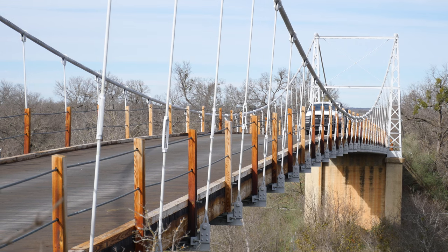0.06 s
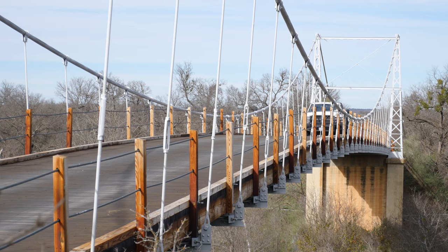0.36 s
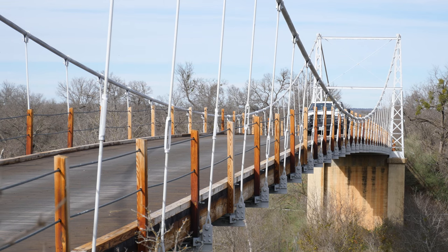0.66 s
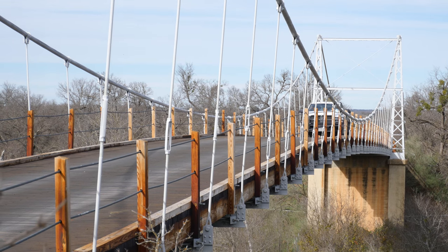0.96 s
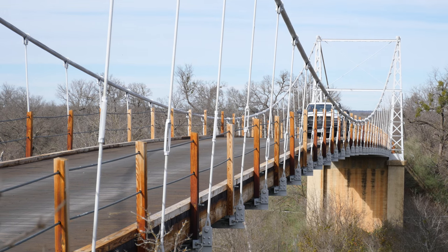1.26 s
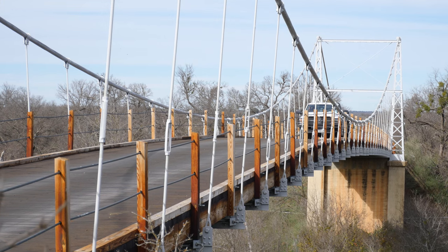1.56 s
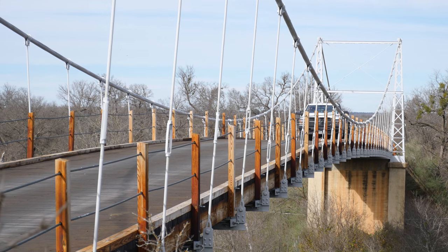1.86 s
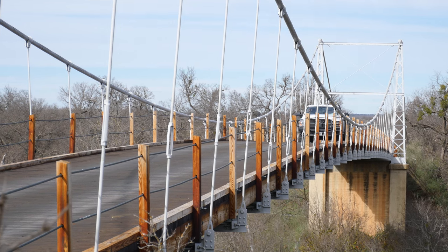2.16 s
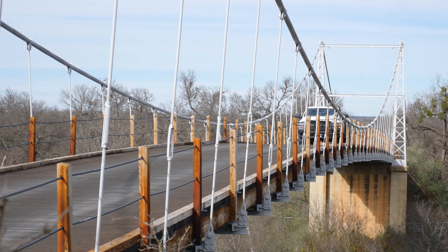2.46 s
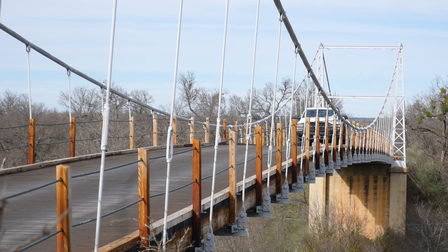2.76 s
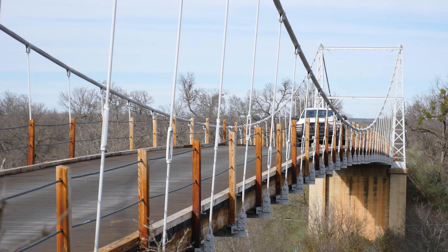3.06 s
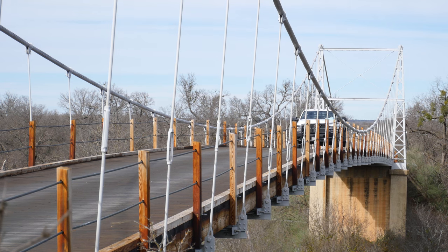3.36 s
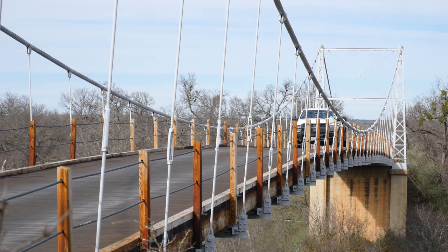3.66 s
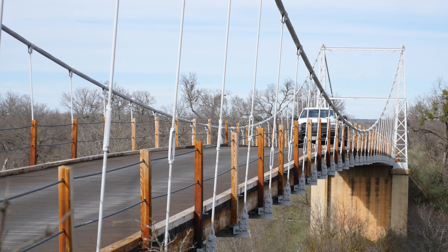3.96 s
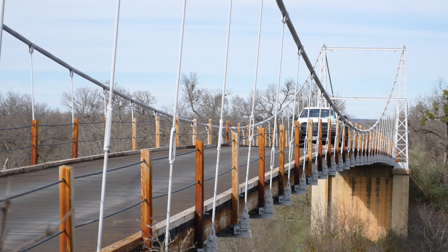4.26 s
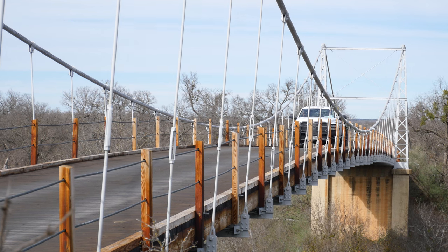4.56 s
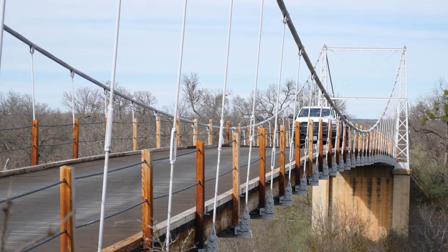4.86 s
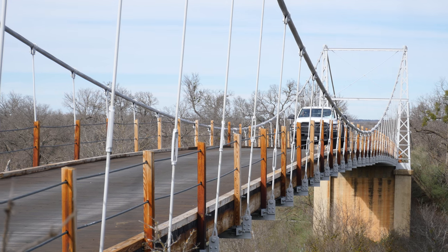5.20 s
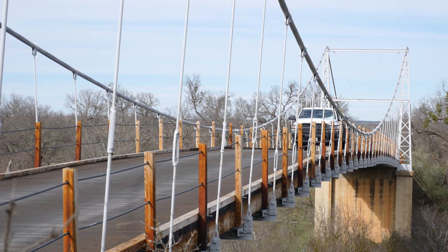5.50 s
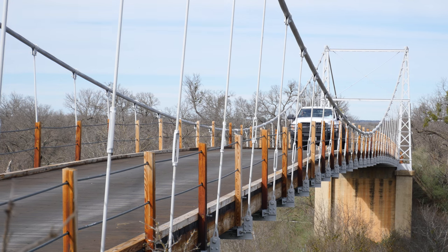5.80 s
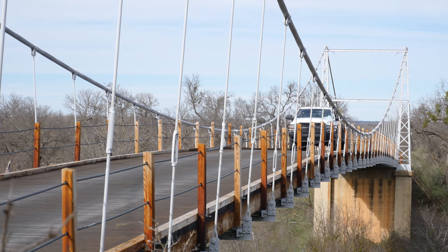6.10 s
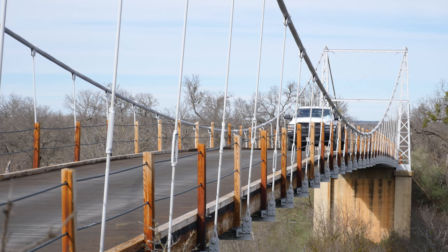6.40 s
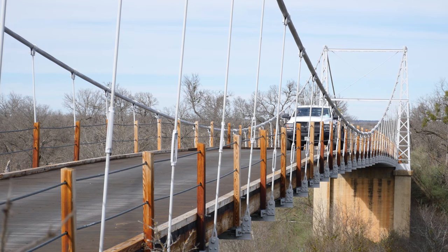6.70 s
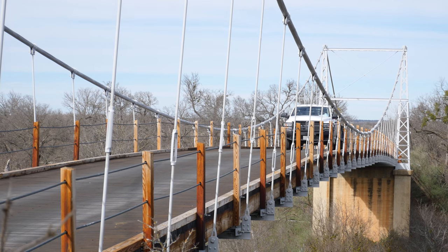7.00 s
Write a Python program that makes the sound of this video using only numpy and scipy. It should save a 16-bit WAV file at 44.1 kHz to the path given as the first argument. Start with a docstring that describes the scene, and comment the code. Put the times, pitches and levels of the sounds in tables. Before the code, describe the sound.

Uneven metallic bangs with a long, hollow ring come from the loose deck plates of a bridge as a truck slowly approaches. They pause after about three seconds, leaving small cable ticks, a few barely audible bird peeps and softly rustling trees. Gusts then rumble and thump on the microphone while the engine hum and its faint pulsing whine swell, and three more steel clanks land near the end.

```python
"""Truck on a steel bridge

A pickup truck creeps across a steel-decked suspension bridge, heard from the bank. Its wheels rock
three loose plates: each slap cracks, booms and rings on through the span. The engine murmurs and
whines faintly, trees rustle, wind buffets the microphone, the railing and cables tick and birds peep."""
import sys
import numpy as np
from scipy import signal
from scipy.io import wavfile
from scipy.ndimage import uniform_filter1d

SR = 44100
rng = np.random.default_rng(int(sys.argv[2]) if len(sys.argv) > 2 else 0)


def to_wav(s):
    """Save 16-bit WAV."""
    ch = np.atleast_2d(s).T  # columns
    pcm = np.round(np.clip(ch, -1, 1) * 32767)  # PCM
    wavfile.write(sys.argv[1], SR, pcm.astype(np.int16))


N = 310464
TIME = np.arange(N) / SR
FRAME, HOP = 1024, 256  # noise is built in short overlapping pieces
HZ = np.fft.rfftfreq(FRAME, 1 / SR)


def amp(db):
    """Turns decibels into a gain."""
    return 10 ** (np.asarray(db) / 20)


def unit_rms(x):
    """Scales a signal to an average power of 1."""
    return x / np.sqrt(np.mean(x ** 2) + 1e-20)


def wobble(n, smooth_samples):
    """A smooth random wiggle around zero."""
    return unit_rms(uniform_filter1d(rng.standard_normal(n), smooth_samples))


def over_pitch(points, hz=HZ):
    """Joins a table's points with straight lines on a log-frequency axis."""
    f, value = np.transpose(points)
    return np.interp(np.log(hz + 1), np.log(f + 1), value)


def over_time(points):
    """Joins a table's points with straight lines in time."""
    return np.interp(TIME, *np.transpose(points))


def fade(t, t60):
    """Dies away by 60 dB in t60 seconds."""
    return np.exp(-np.log(1000) * t / t60)


def pan(lean_db):
    """Left and right gains; a positive lean is louder on the left."""
    return amp(np.array([[.5], [-.5]]) * lean_db)


def add(mix, start_s, sound):
    """Mixes in a stereo sound at its start time."""
    at = round(start_s * SR)
    sound, part = sound[:, max(-at, 0):], mix[:, max(at, 0):]
    part[:, :sound.shape[1]] += sound[:, :part.shape[1]]


def filtered(x, order, hz, kind):
    """Cuts away part of the frequency range; a higher order cuts more steeply."""
    return signal.sosfilt(signal.butter(order, hz, kind, fs=SR, output="sos"), x)


# how alike the bridge sounds on the left and right: f/Hz, likeness (1 or more is identical)
BRIDGE_LIKENESS = [(60, 2), (300, 0.86), (700, 1.07), (1400, 0.54), (3100, 0.7), (7000, 0.9), (15000, -0.9)]
# how much louder the bridge is on the left: f/Hz, lean/dB
BRIDGE_LEAN = [(100, 3.5), (380, 1.2), (700, 4.6), (1300, 5.1), (2400, 7), (4400, 3.7), (8000, 5.3),
               (15000, 1)]
def noise(seconds, tone_db, t60=np.inf,
          likeness=over_pitch(BRIDGE_LIKENESS), lean_db=over_pitch(BRIDGE_LEAN)):
    """Stereo noise; tone_db sets its balance of low and high, and each frequency can fade on its own."""
    n = round(seconds * SR)
    t = np.arange(n // HOP + 6)[:, None] * HOP / SR
    left, other = np.exp(2j * np.pi * rng.random((2, len(t), len(HZ))))
    likeness = np.clip(likeness, -1, 1)
    right = likeness * left + np.sqrt(1 - likeness ** 2) * other
    spectra = np.array([left, right]) * pan(lean_db)[:, None]
    spectra = spectra * unit_rms(amp(tone_db)) * fade(t, t60) * np.sqrt(6 / FRAME)
    return signal.istft(spectra.transpose(0, 2, 1), nperseg=FRAME, noverlap=FRAME - HOP)[1][:, :n]


def ring(notes, t):
    """Struck steel sounds all its notes at once; each fades, a little out of step left and right."""
    phases = rng.random((len(notes), 1, 1)) + rng.normal(0, .03, (len(notes), 2, 1))
    out = np.zeros((2, len(t)))
    for (hz, db, t60), phase in zip(notes, phases):
        gain = pan(over_pitch(BRIDGE_LEAN, hz)) * amp(db)
        out += gain * fade(t, t60) * np.sin(2 * np.pi * (hz * t + phase))
    return out


def steel_crack(t, notes, ring_db, snap_db, snap_hz, contact_s):
    """Steel hits steel: a brief ring, and a snap as the rough edges grind together."""
    snap = noise(2, -30 * np.log2((HZ + 1) / snap_hz) ** 2) * np.exp(-(t / 0.00095) ** 2)
    crack = (amp(ring_db) * ring(notes, t) + amp(snap_db) * snap) * np.tanh(t / contact_s) ** 2
    return filtered(crack, 1, (5500, 6300), "bandstop")  # hollow between its lower and upper notes


def chatter(crack, bounces=12, gap_s=.0055, fade_s=0.064):
    """The crack repeats and fades as the plate bounces to rest on its beam."""
    out = np.zeros_like(crack)
    for k, (late, size) in enumerate(rng.random((bounces, 2)), 1):
        start_s = (k + late) * gap_s
        add(out, start_s, (.5 + size) * np.exp(-start_s / fade_s) * crack)
    return out


# tone of the whole span ringing: f/Hz, level/dB
SPAN_TONE = [(50, -54), (130, -7), (240, -7.5), (390, -2.5), (500, 1), (630, -0.5), (780, -6.5), (950, -10),
             (1350, -13), (1850, -18.5), (2600, -5.5), (3700, -43), (6000, -53), (12000, -55)]
# how long the span rings: f/Hz, fade time/s
SPAN_FADE = [(150, 4), (600, 3.7), (1000, 2.52), (2000, 0.37), (4000, 0.55), (9000, .4)]
def span_ring(t, ripple_db, return_s=0.2, return_width_s=0.044, return_db=4.5):
    """Bending waves spread along the span, come back from its end and swell the ring once."""
    swell_db = return_db * np.exp(-((t - return_s) / return_width_s) ** 2)
    flicker_db = 1.4 * wobble(len(t), 700)  # crossing waves make the ring uneven
    ringing = noise(2, over_pitch(SPAN_TONE) + ripple_db, over_pitch(SPAN_FADE))
    return amp(swell_db + flicker_db) * ringing * (1 - np.exp(-t / 0.024))


# tone of the dull knock of a plate on its beam: f/Hz, level/dB
KNOCK_TONE = [(100, -40), (300, 4.5), (500, 6), (780, -1), (1000, -8), (1230, 6.5), (1700, -15),
              (2100, -7.5), (2800, -32), (8000, -48)]
# how long a plate's bang lasts: f/Hz, fade time/s
BANG_FADE = [(150, 0.34), (500, 0.31), (1500, 0.86), (3800, 0.42), (7000, 0.26), (12000, 0.19)]
# the notes the deck rings with: f/Hz, level/dB, fade time/s
DECK_NOTES = [(135.4, -33.5, 0.63), (156, -40.5, 2.7), (230.4, -33, 2.04), (241.2, -39.5, 3.8),
              (258, -23.5, 0.19), (285, -22, 0.17), (349, -38.5, 3.9), (421, -20.5, 0.49),
              (481, -23.5, 0.33), (500, -42, 3.2), (538, -39.5, 2.1), (559, -39.5, 2.4), (611, -36.5, 3.3),
              (633, -42, 1.9), (657, -30.5, 0.39), (733, -40, 1.8), (834, -33, 0.18), (895, -29.5, 0.32),
              (947, -39.5, 1.05), (1231, -40.5, 0.81), (1305, -45.5, 1), (1553, -44.5, 1.4),
              (1710, -45, 1.2), (1863, -42, 0.91), (2630, -42.5, .35), (3390, -40, 0.46), (3476, -45, 0.76),
              (3505, -37, 0.45), (3597, -41.5, 0.46), (3960, -42, 0.52), (4060, -44, 0.3), (4100, -43, .35),
              (4480, -39, 0.23)]
def plate(slaps, bang_tone, crack_notes, bang_db, chatter_db, span_db, deck_db, rise_s, **crack_shape):
    """A loose plate lands much the same way each time: a crack and a knock, a bang, a long ring."""
    t = np.arange(2 * SR) / SR
    ripple_db = 4 * rng.uniform(-0.57, 1, len(HZ)) * (HZ > 700)  # the steel's many small resonances
    crack = steel_crack(t, crack_notes, **crack_shape)
    knock = noise(2, over_pitch(KNOCK_TONE)) * np.exp(-t / 0.0054) * np.tanh(t / 0.0028)
    tone_db, t60 = over_pitch(bang_tone) + ripple_db, over_pitch(BANG_FADE)
    usual_bang, *fresh_bangs = (amp(bang_db) * noise(2, tone_db, t60) for _ in range(len(slaps) + 1))
    span = amp(span_db) * span_ring(t, ripple_db)
    bounces = amp(chatter_db) * chatter(crack)
    deck = amp(deck_db) * ring(DECK_NOTES, t)
    build_up = 1 - np.exp(-t / rise_s)  # slower bending waves fill the plate after the crack
    fresh_share = 0.24  # the bang varies because the wheel meets another spot each time
    out = np.zeros((2, N))
    for (start_s, force_db, bright_db, knock_db), fresh_bang in zip(slaps, fresh_bangs):
        bang = np.sqrt(1 - fresh_share) * usual_bang + np.sqrt(fresh_share) * fresh_bang
        slap = crack + bounces + build_up * (bang + deck) + span
        extra_treble = (amp(bright_db) - 1) * filtered(slap, 1, 6000, "high")
        add(out, start_s, amp(force_db) * (slap + extra_treble) + amp(knock_db) * knock)
    return filtered(out, 4, 11500, "low")  # softens the highest treble of the slaps


# when a wheel slaps each plate down: t/s, force/dB, brightness/dB, knock level/dB
PLATE_1_SLAPS = [(-.045, -1, 5, -29), (.339, -2.5, 3, -23), (.6715, -2, 2.5, -22.5), (1.429, -3, 2.5, -24),
                 (1.8193, -1.76, 4, -24.5), (1.911, -2.5, 4, -22), (3.1318, -3, 2.5, -24.5)]
PLATE_2_SLAPS = [(5.651, 1.5, -1.5, -22), (5.7735, 0.5, -7, -22.5)]
PLATE_3_SLAPS = [(6.7665, 1, 5, -17)]
# tone of each plate's bang: f/Hz, level/dB
PLATE_1_BANG = [(50, -21), (130, -0.5), (270, 6), (370, -3.5), (470, 2.5), (750, -7.5), (950, -11.5),
                (1400, -18.5), (1900, -14.5), (2600, -26), (3800, -13.5), (6000, -22.5), (8300, -18),
                (12500, -29.5)]
PLATE_2_BANG = [(50, -40), (200, 11.5), (450, 2), (800, -5), (1200, -14.5), (1700, -12), (2500, -21),
                (3200, -13), (4000, -7.5), (4900, -15.5), (6000, -18), (8800, -16.5), (12500, -22)]
PLATE_3_BANG = [(50, -37), (200, 11.5), (450, 6), (800, 1.5), (1250, -6), (1700, -3.5), (2300, -13),
                (3200, -4.5), (4700, -7.5), (6000, -15), (8600, -10.5), (12500, -25)]
# the short notes in each plate's crack: f/Hz, level/dB, fade time/s
PLATE_1_CRACK = [(265, -7, .05), (437, 1, 0.033), (900, -5.5, 0.044), (3330, 0, 0.011), (3570, -1, 0.012),
                 (3720, 1.5, 0.014), (4530, 1.5, 0.016), (5150, 1.5, 0.013), (7250, -0.5, 0.0097),
                 (8200, -3, 0.013), (8720, -3.5, 0.013), (9750, -7, 0.0091)]
PLATE_2_AND_3_CRACK = [(740, -4, 0.037), (910, 0, 0.043), (1177, 0, 0.035), (1730, -11, .05),
                       (3210, -1, .018), (3830, -7, 0.035), (4550, -4, 0.022), (4880, -3, 0.02),
                       (7400, -8, 0.018), (8070, -10, 0.015), (8800, -6, 0.01)]
def loose_plates():
    """The wheels rock three plates in turn, each with a voice of its own."""
    first = plate(PLATE_1_SLAPS, PLATE_1_BANG, PLATE_1_CRACK,
                  bang_db=-21.5, chatter_db=-25, span_db=-33.5, deck_db=-4, rise_s=0.0053,
                  ring_db=-21, snap_db=-53, snap_hz=3800, contact_s=0.00012)
    second = plate(PLATE_2_SLAPS, PLATE_2_BANG, PLATE_2_AND_3_CRACK,
                   bang_db=-28.5, chatter_db=-18, span_db=-61, deck_db=-17, rise_s=0.0014,
                   ring_db=-29.5, snap_db=-28.5, snap_hz=3650, contact_s=0.00029)
    third = plate(PLATE_3_SLAPS, PLATE_3_BANG, PLATE_2_AND_3_CRACK,
                  bang_db=-27, chatter_db=-18, span_db=-41.5, deck_db=-9.5, rise_s=0.0053,
                  ring_db=-27, snap_db=-15.5, snap_hz=8300, contact_s=0.0006)
    return first + second + third


# how the truck's murmur and whine grow as it comes closer: t/s, level/dB
MURMUR_LOUDNESS = [(0, -47), (3, -47), (4.2, -47.5), (5.2, -44), (6.3, -42), (7.04, -38.5)]
WHINE_LOUDNESS = [(0, -58), (4, -52), (5.3, -47), (7.04, -47)]
# tone of its broad murmur and of its narrow drone: f/Hz, level/dB
MURMUR_TONE = [(40, -6.5), (110, 17), (300, 8), (600, 3.5), (900, 0.5), (1100, 4), (1380, -7.5), (1650, -2),
               (2000, -5.5), (2450, -6), (2900, -9), (3250, -15.5), (6000, -29.5), (12000, -49)]
DRONE_TONE = [(1400, -19), (1580, 9), (1680, 6), (1850, -35)]
def truck(whine_hz=745, throb_hz=5.3, throb_peak_s=5.7):
    """Engine and tyres murmur, with a faint, wavering whine that swells about five times a second."""
    pitch_hz = whine_hz * (1 + .014 * wobble(N, 900))
    flicker_db = 2.5 * wobble(N, 900)
    throb = (.5 + .5 * np.cos(2 * np.pi * throb_hz * (TIME - throb_peak_s))) ** 2
    whine = throb * amp(flicker_db) * np.sin(2 * np.pi * np.cumsum(pitch_hz) / SR)
    murmur = noise(N / SR, over_pitch(MURMUR_TONE), likeness=0.73, lean_db=0)
    drone = amp(-14.5) * noise(N / SR, over_pitch(DRONE_TONE), likeness=0.86, lean_db=0)
    return amp(over_time(MURMUR_LOUDNESS)) * (murmur + drone) + amp(over_time(WHINE_LOUDNESS)) * whine


# tone of the rustling trees: f/Hz, level/dB
RUSTLE_TONE = [(100, 6.5), (1000, 13), (3000, 2.5), (4800, 3), (6500, -0.5), (7900, -2), (9000, 1),
               (11500, -8.5), (15000, -10.5)]
def trees():
    """A breeze in dry trees makes a soft, steady hiss."""
    return amp(-58) * noise(N / SR, over_pitch(RUSTLE_TONE), likeness=0.45, lean_db=-0.5)


# strength of the light breeze that is always there: t/s, level/dB
LIGHT_BREEZE = [(0, -67), (1, -65), (1.5, -43), (3.4, -42), (4.1, -51.5)]
# short puffs of wind: t/s, level/dB, half length/s
SHORT_PUFFS = [(0.756, -38, 0.024), (1.225, -38.5, 0.061), (2.56, -42, 0.037), (2.94, -38.5, 0.035),
               (3.602, -36.5, 0.034), (3.786, -29.5, 0.029)]
# strength of the long gusts: t/s, level/dB
LONG_GUSTS = [(4.3, -62), (4.57, -31), (4.62, -36), (4.8, -36), (5.05, -30.5), (5.18, -39.5), (5.25, -27.5),
              (5.35, -34.5), (5.45, -32.5), (6.05, -29.5), (6.15, -35), (6.22, -34.5), (6.33, -57),
              (6.42, -41.5), (6.6, -41.5), (6.7, -30), (7.04, -27)]
def wind_strength():
    """Breeze, puffs and gusts add up to one wind strength, in dB."""
    puff_power = sum((amp(db) * np.exp(-((TIME - peak_s) / half_s) ** 2 / 2)) ** 2
                     for peak_s, db, half_s in SHORT_PUFFS)
    power = amp(over_time(LIGHT_BREEZE)) ** 2 + puff_power + amp(over_time(LONG_GUSTS)) ** 2
    return 10 * np.log10(power)


# tone of the wind's low rumble: f/Hz, level/dB
RUMBLE_TONE = [(20, -25), (40, -86), (65, -41), (100, 11.5), (160, -3.5), (250, -2), (350, -26.5),
               (500, -34.5), (900, -32.5), (3000, -80)]
def wind(level_db=-2.5, buffet_hz=250):
    """Churning air rumbles unevenly on the microphone; strong gusts add a brighter buffeting."""
    gust_db = wind_strength()
    lumps_db = 5 * np.tanh(unit_rms(uniform_filter1d(wobble(N, 400), 300)))
    rumble = noise(N / SR, over_pitch(RUMBLE_TONE), likeness=0.84, lean_db=-1.5)
    buffet = noise(N / SR, -18 * np.log2((HZ + 1) / buffet_hz) ** 2, likeness=0.17, lean_db=24.5)
    buffet_db = -12 + .5 * (gust_db - gust_db.max() + lumps_db)
    return amp(level_db + gust_db + lumps_db) * (rumble + amp(buffet_db) * buffet)


def small_swirls(per_second=22):
    """Random swirls of air that grow with the wind, as rows like those of BIG_SWIRLS."""
    late, size, pitch, lean = rng.standard_normal((int(per_second * N / SR), 4)).T
    times = np.clip((np.arange(len(late)) + .5 + .5 * late) / per_second, 0, N / SR)
    db = np.interp(times, TIME, wind_strength()) + 6.5 + 1.5 * np.tanh(size)
    hz = 169 * 2 ** (0.43 * pitch)
    lean_db = 5 + 7.5 * lean
    return list(np.transpose([times, db, hz, lean_db]))


def thump(cycles, phase):
    """A wave that swells and dies within a cycle or two."""
    return np.exp(-(cycles / 0.79) ** 2) * np.cos(2 * np.pi * (cycles + phase))


# the hardest swirls of air: t/s, base level/dB, base f/Hz, base lean to the left/dB
BIG_SWIRLS = [(0.745, -16.5, 146, -6), (0.767, -21.5, 150, 0), (1.16, -26.5, 156, 0), (1.247, -24, 186, 2),
              (2.56, -24.5, 182, 0), (2.938, -16, 139, 4.5), (2.995, -22.5, 150, -2), (3.621, -19, 176, 0),
              (3.788, -19, 170, 4), (4.229, -24.5, 177, 5), (4.564, -15.5, 144, -5), (4.582, -23, 270, 10),
              (4.665, -24, 192, 5), (4.751, -15.5, 215, 8), (4.837, -17.5, 230, 9), (4.889, -13, 190, 4),
              (4.903, -15.5, 259, -3), (4.914, -16.5, 137, -4), (4.985, -12.5, 237, 5),
              (5.015, -17.5, 186, -2), (5.047, -18, 160, -5), (5.078, -17, 201, 16),
              (5.087, -11.5, 173, -12), (5.262, -11.5, 220, 3), (5.28, -19, 201, -6), (5.305, -13, 226, 9),
              (5.409, -13, 199, 6), (5.464, -14.5, 171, -12), (5.482, -13, 205, -2), (5.499, -10.5, 210, 1),
              (5.532, -15, 213, -12), (5.626, -18.5, 233, 13), (5.759, -17, 203, -2),
              (5.831, -11.5, 176, -2), (5.902, -18.5, 137, -1), (5.919, -22, 232, 8),
              (5.952, -18.5, 185, -4), (6.008, -15.5, 225, 14), (6.027, -14.5, 207, 6),
              (6.081, -13, 207, 2), (6.098, -18, 216, 4), (6.199, -15.5, 144, -7), (6.411, -19, 191, 5),
              (6.688, -16, 170, 5), (6.718, -16, 220, 8), (6.751, -16, 208, 17), (6.884, -22, 226, 8),
              (6.962, -16, 156, 3), (6.992, -13.5, 201, 0), (7.025, -16, 203, 23)]
def swirls(core_ratio=0.93, fine_ratio=1.53):
    """Each swirl thumps the microphone; strong ones shed a finer swirl, mostly on the windy side."""
    out, t = np.zeros((2, N)), np.arange(-SR // 20, SR // 20) / SR
    strongest_db = max(row[1] for row in BIG_SWIRLS)
    rows = BIG_SWIRLS + small_swirls()
    for (peak_s, db, hz, lean_db), (phase, skew, fine_phase) in zip(rows, rng.random((len(rows), 3))):
        offset = np.array([[-.5], [.5]]) * 0.46 * (skew - .5)  # each side feels it a little differently
        core = pan(0.29 * lean_db) * thump(core_ratio * hz * t, phase + offset)
        fine = pan(6 + lean_db) * thump(fine_ratio * hz * t, fine_phase + 2 * offset)
        fine_db = -9 + 0.17 * (db - strongest_db)
        add(out, peak_s + t[0], amp(db) * (amp(-2) * core + amp(fine_db) * fine))
    return out


# ticks of the railing and cables: t/s, level/dB, f/Hz, width/octaves, fade time/s
RAILING_TICKS = [(2.368, -56.5, 9300, .2, .03), (2.735, -45, 1200, .16, 0.063),
                 (2.77, -45, 1100, 0.15, 0.081), (2.805, -38.5, 4480, 0.39, 0.021),
                 (2.884, -43, 1130, 0.16, 0.11), (3.02, -52, 8800, .2, 0.024),
                 (3.3585, -46.5, 9300, 0.23, 0.014), (3.675, -49, 2490, 0.33, 0.035),
                 (3.715, -38, 2270, 0.67, 0.069), (4.414, -38.5, 364, 0.34, 0.87),
                 (4.412, -41.5, 880, 0.56, 0.26), (5.003, -38.5, 1100, 0.21, 0.05),
                 (5.111, -55, 9100, .17, .025), (5.203, -49, 4180, 0.5, .025),
                 (6.288, -45, 2640, 0.53, 0.059)]
def ticks(rise_cycles=0.67):
    """The railing and cables tick as the bridge shifts; the low ticks start softly."""
    out, t = np.zeros((2, N)), np.arange(SR // 2) / SR
    for start_s, db, hz, octaves, t60 in RAILING_TICKS:
        band_db = -10 * np.log10(1 + (np.log2((HZ + 1) / hz) / octaves) ** 6)
        burst = noise(.5, band_db, lean_db=1.5)
        rise = np.tanh(t * hz / rise_cycles) ** 2
        add(out, start_s, amp(db) * burst * rise * fade(t, t60))
    return out


# bird peeps: t/s, length/s, level/dB, start f/Hz, middle f/Hz, end f/Hz
BIRD_PEEPS = [(2.66, .016, -59, 6100, 6300, 6800), (3.725, 0.05, -59, 7600, 8300, 8600),
              (3.831, 0.038, -54, 8050, 8200, 8000), (4.496, .035, -61, 3700, 3720, 3560),
              (4.573, 0.019, -58, 3700, 3710, 3580)]
def birds():
    """Small birds give thin whistles, each gliding through three pitches."""
    out = np.zeros((2, N))
    for start_s, length_s, db, *pitches in BIRD_PEEPS:
        progress = np.linspace(0, 1, round(length_s * SR))
        hz = np.polyval(np.polyfit([0, .5, 1], pitches, 2), progress)
        whistle = np.sin(np.pi * progress) * np.sin(2 * np.pi * np.cumsum(hz) / SR)
        add(out, start_s, pan(0) * amp(db) * whistle)
    return out


def scene():
    """The bridge, the truck and the open air together."""
    return loose_plates() + ticks() + truck() + wind() + birds() + trees() + swirls()


def record(dry):
    """Trims away the deepest rumble and the very highest treble."""
    low_cut = filtered(dry, 3, 48, "high")
    treble_cut = signal.firwin(255, 15700, window=("kaiser", 9), fs=SR)
    return signal.oaconvolve(low_cut, treble_cut[None], "same")


dry = scene()
out = record(dry)
to_wav(out)
```